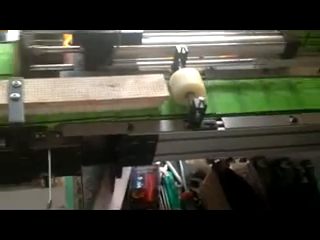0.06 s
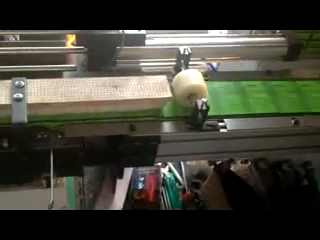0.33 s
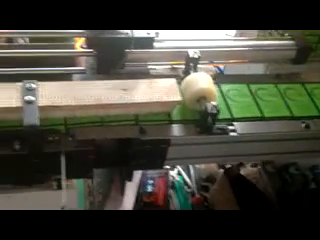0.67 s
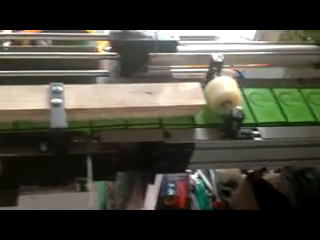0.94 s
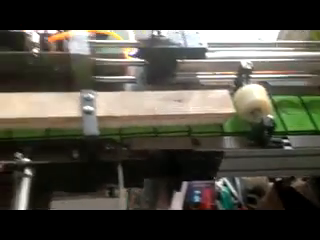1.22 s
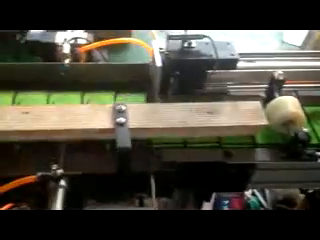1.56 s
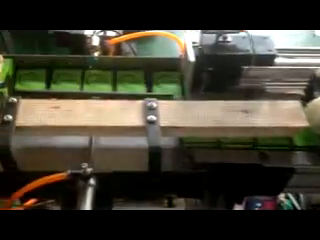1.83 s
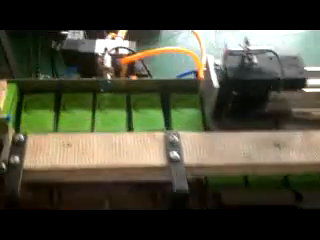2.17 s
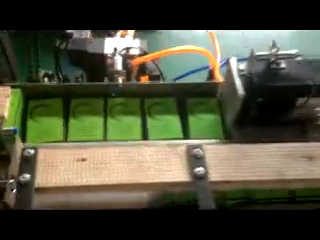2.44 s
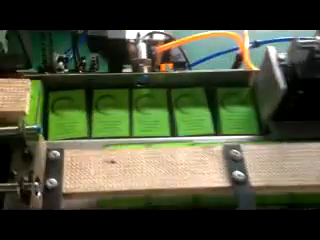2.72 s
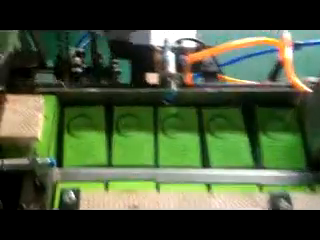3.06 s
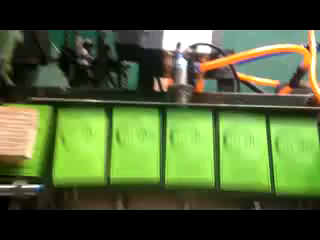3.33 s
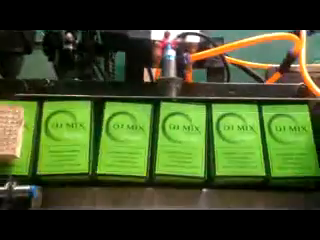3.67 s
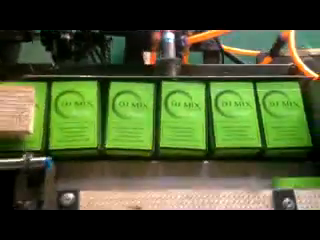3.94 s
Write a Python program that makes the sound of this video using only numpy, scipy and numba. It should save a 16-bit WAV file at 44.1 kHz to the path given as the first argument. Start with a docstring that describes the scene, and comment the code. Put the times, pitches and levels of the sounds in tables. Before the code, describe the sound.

A pneumatic packing machine hums, rattles and hisses close by in a factory hall, cutting out briefly at 0.1 seconds. The air whistles from 0.5 to 1.2 seconds. Cylinders slam with metallic clacks around 0.6, 0.7, 1.5, 1.8, 3.1, 3.4 and 4 seconds. Pushers and cartons knock in clusters from 1.3 to 1.8, then singly. Slides groan briefly around 1.7 and 2, and repeatedly after 3.2 seconds.

```python
"""A factory hall, close to a pneumatic carton-packing machine.
A motor hums and rattles once per turn, and a jet of compressed air hisses, whistling for a while.
Cylinders slam into their end stops with a short metal chatter; pushers and cartons knock in between.
Slides groan with friction as they travel. The sound cuts out briefly near the start."""
import sys
import numpy as np
from scipy import signal
from scipy.fft import rfft, irfft
from scipy.io import wavfile
from numba import njit

SR = 44100
rng = np.random.default_rng(int(sys.argv[2]) if len(sys.argv) > 2 else 0)


def persist_wave(psi):
    """Save psi, clipped to +-1, as 16-bit WAV."""
    counts = np.round(np.clip(psi, -1, 1) * 32767).astype(np.int16)
    wavfile.write(sys.argv[1], SR, np.atleast_2d(counts).T)


N = 176400
T = np.arange(N) / SR
CLACK_RISE_S = 0.00049


def amp(db):
    """Decibels to gain."""
    return 10 ** (np.asarray(db) / 20)


def unit(x):
    """Scale to rms 1."""
    return x / np.sqrt(np.mean(x ** 2))


def noise():
    """White noise."""
    return rng.standard_normal(N)


def curves(table):
    """Each column after the first, interpolated linearly in time."""
    times_s, *columns = np.array(table).T
    return [np.interp(T, times_s, column) for column in columns]


def colour(x, spectrum):
    """Shape x by (Hz, dB) points; rms 1."""
    hz, db = np.array(spectrum).T
    bins_hz = np.maximum(np.fft.rfftfreq(N, 1 / SR), 1)
    gain = amp(np.interp(np.log(bins_hz), np.log(hz), db))
    return unit(irfft(rfft(x) * gain, N))


def wander(rate_hz):
    """Random drift, low-passed at about rate_hz; rms 1."""
    gain = np.exp(-(np.fft.rfftfreq(N, 1 / SR) / rate_hz) ** 2)
    return unit(irfft(rfft(noise()) * gain, N))


@njit
def svf(x, hz, width_hz):
    """State-variable band-pass with moving centre and width."""
    y, band_state, low_state = np.empty(len(x)), 0., 0.
    for i in range(len(x)):
        g, damping = np.tan(np.pi * hz[i] / SR), width_hz[i] / hz[i]
        v = (band_state + g * (x[i] - low_state)) / (1 + g * (g + damping))
        band_state = 2 * v - band_state
        low_state += 2 * g * v
        y[i] = damping * v
    return y


def band(x, hz, width_hz):
    """Two band-passes in series; rms 1."""
    hz, width_hz = hz * np.ones(N), width_hz * np.ones(N)
    return unit(svf(svf(x, hz, width_hz), hz, width_hz))


def strike(start_s, hold_s, t60_s):
    """Instant attack, hold, exponential release."""
    return (T >= start_s) * np.exp(-np.log(1000) * np.clip((T - start_s - hold_s) / t60_s, 0, 2))


def echoes(x, t60_s, db):
    """Add a dense tail of reflections."""
    tail = noise() * strike(0, 0, t60_s)
    return x + amp(db) * signal.fftconvolve(x, tail / np.sqrt(np.sum(tail ** 2)))[:N]


# Motor tones. Each row: frequency in Hz, base level in dB.
MOTOR_TONES = [(150.3, -37.5), (167, -42.5), (233.8, -42), (267.2, -41), (283.9, -46.5), (350.7, -46),
               (484.3, -46.5), (799, -46), (833, -41.5), (1119, -44), (1803, -50.5), (1886, -43)]
# Rattle spectrum. Each row: frequency in Hz, relative density in dB.
RATTLE_SPECTRUM = [(60, -7.5), (105, -14.5), (150, -3), (260, 0), (440, -1.5), (820, 2.5), (1000, -3),
                   (1500, -7), (1920, -6.5), (2300, -9.5), (3100, -14), (4000, -6.5), (5200, -7),
                   (8000, -24)]
# Motor gains. Each row: time in seconds, hum gain in dB, rattle gain in dB.
MOTOR_GAINS = [(.3, 2, -4), (1.2, 1.5, -3.5), (1.5, 4, 0), (3.05, 3.5, -1), (3.11, -10, -5.5),
               (3.3, -1, -2), (3.52, -4.5, -6), (3.9, -3.5, -2)]


def motor(shaft_hz=16.7, repeat_share=0.31, rattle_db=-23, sway_db=0.5):
    """Hum over a rattle that partly repeats on every turn of the shaft."""
    hum = 0
    for hz, db in MOTOR_TONES:
        peak = np.sqrt(2) * amp(db + sway_db * wander(5.3))
        hum += peak * np.sin(2 * np.pi * (hz * T + rng.random()) + 0.24 * wander(4.6))
    each_turn = np.resize(noise()[:int(SR / shaft_hz)], N)
    shaking = np.sqrt(repeat_share) * each_turn + np.sqrt(1 - repeat_share) * noise()
    rattle = colour(shaking * amp(sway_db * wander(40)), RATTLE_SPECTRUM)
    hum_gain_db, rattle_gain_db = curves(MOTOR_GAINS)
    return hum * amp(hum_gain_db) + rattle * amp(rattle_db + rattle_gain_db)


# Jet timbre at a moving listener. Each row: time in seconds, main resonance in Hz, its width in Hz,
# upper resonance in Hz, its relative level in dB, relative rush level in dB.
JET_TIMBRE = [(.9, 5470, 1850, 6960, -2.5, -6.5), (1.33, 5280, 1800, 6940, -10, -6),
              (2.1, 5490, 2120, 7500, -6.5, -10), (2.7, 5130, 1730, 7460, -3.5, -25.5),
              (3.25, 4550, 1510, 7170, -6, -8.5), (3.7, 5330, 1583, 7470, -10.5, -15)]
# Escaping air. Each row: time in seconds, level in dB.
JET_LEVEL = [(0, -19.5), (.2, -23), (.59, -21.5), (.612, -29), (.71, -28.5), (.735, -21.5), (1.15, -21),
             (1.3, -19), (1.4, -18), (1.445, -27.5), (1.78, -30.5), (1.98, -22), (3.06, -20.5),
             (3.11, -28.5), (3.42, -28), (3.49, -21.5), (3.8, -19)]


def air_jet(whistle_start_s=0.46, whistle_end_s=1.2):
    """Compressed air: two broad resonances, a lower rush and an edge tone, reflected by the frame."""
    main_hz, main_width_hz, upper_hz, upper_db, rush_db = curves(JET_TIMBRE)
    level_db, = curves(JET_LEVEL)
    main = band(noise(), main_hz, main_width_hz)
    upper = band(noise(), upper_hz, width_hz=860) * amp(upper_db)
    rush = band(noise(), hz=2260, width_hz=3600) * amp(rush_db)
    whistle = band(noise(), hz=4567, width_hz=220) * amp(-7.5)
    whistle *= (T > whistle_start_s) & (T < whistle_end_s)
    return unit(echoes(main + upper + rush + whistle, t60_s=0.06, db=-14)) * amp(level_db)


def contacts(rate_per_s=6000):
    """Dense tiny impacts of parts chattering against each other."""
    return (rng.random(N) < rate_per_s / SR) * np.sign(noise())


def snap(start_s, hz, rise_s):
    """First impact: a heavily damped ring that peaks at rise_s and lasts a few cycles."""
    age = np.clip((T - start_s) / rise_s, 0, 20)
    return age * np.exp(1 - age) * np.sin(2 * np.pi * hz * (T - start_s))


# Modes of the steel stops. Each row: frequency in Hz, width in Hz, relative level in dB.
STEEL_MODES = [(4020, 1400, 0), (4646, 510, -1), (5180, 1700, 0.5), (6390, 980, 1), (7760, 180, -5)]


def steel_ring():
    """Chatter ringing in the steel stops; rms 1."""
    return unit(sum(amp(db) * band(contacts(), hz, width_hz) for hz, width_hz, db in STEEL_MODES))


# Machine bed spectrum. Each row: frequency in Hz, relative density in dB.
BED_SPECTRUM = [(60, -26.5), (190, 8), (700, -6), (1100, 5.5), (1700, 0), (8000, -43.5)]
# End-stop hits. Each row: start in seconds, chatter hold in seconds, bed gain in dB, thump in Hz,
# clank gain in dB, clank in Hz, steel gain in dB.
CYLINDER_SLAMS = [(0.5912, 0.0025, -14.5, 970, -11.5, 2790, -17),
                  (0.735, 0.021, -20, 1320, -22.5, 2630, -17), (1.459, 0.012, -21.5, 410, -19.5, 2090, -13),
                  (1.828, 0.018, -19, 560, -24.5, 2060, -14.5),
                  (3.0676, 0.01, -17.5, 550, -20, 2090, -13.5), (3.4417, .014, -17.5, 294, -20, 2320, -12),
                  (3.961, 0.012, -21, 404, -18.5, 2210, -9.5)]


def cylinder_slams(impact_db=6.5, thump_rise_cycles=0.44):
    """A piston hits its stop and chatters: the bed thumps and booms, the bracket clanks, steel rings."""
    bed, steel, out = colour(contacts(), BED_SPECTRUM), steel_ring(), 0
    for start_s, hold_s, bed_db, thump_hz, clank_db, clank_hz, steel_db in CYLINDER_SLAMS:
        chatter = strike(start_s, hold_s, t60_s=0.057)
        clank = band(contacts(), clank_hz, width_hz=680) * chatter
        clank += amp(impact_db) * snap(start_s, clank_hz, CLACK_RISE_S)
        boom = bed * strike(start_s, hold_s / 2, t60_s=0.082)
        thump = amp(impact_db) * snap(start_s, thump_hz, thump_rise_cycles / thump_hz)
        out += amp(clank_db) * clank + amp(steel_db) * steel * chatter + amp(bed_db) * (boom + thump)
    return out


# Thud spectrum. Each row: frequency in Hz, relative density in dB.
THUD_SPECTRUM = [(80, -28.5), (300, -3.5), (550, 0), (780, 5.5), (1000, -6), (2000, -5.5), (6000, -20.5)]
# Knocks. Each row: start in seconds, thud gain in dB, clack gain in dB, clack in Hz, tick gain in dB.
PUSHER_KNOCKS = [(1.35, -42, -4, 2040, -23), (1.364, -30.5, -7.5, 2100, -22), (1.3896, -23, -9, 3070, -25),
                 (1.4222, -24.5, -14.5, 800, -15.5), (1.428, -17, -11.5, 1144, -27),
                 (1.629, -28, -16.5, 1380, -14.5), (1.641, -21, -10, 1930, -33),
                 (1.791, -11.5, -8.5, 1190, -25.5), (1.809, -17, -11.5, 1400, -19),
                 (2.2974, -16, -10, 1270, -19), (2.8675, -16.5, -7.5, 1850, -25),
                 (3.3987, -16, -6.5, 720, -22.5), (3.4165, -16, -10, 530, -21),
                 (3.922, -18.5, -15.5, 1400, -22)]


def pusher_knocks(rattle_db=-8.5):
    """Pushers and cartons knock: a clack at the struck part's pitch, a hollow thud, a steel tick."""
    thud, tick, out = colour(contacts(), THUD_SPECTRUM), steel_ring(), 0
    for start_s, thud_db, clack_db, clack_hz, tick_db in PUSHER_KNOCKS:
        rattle = band(contacts(), clack_hz, width_hz=1800) * strike(start_s, 0, t60_s=0.023)
        out += amp(clack_db) * (snap(start_s, clack_hz, CLACK_RISE_S) + amp(rattle_db) * rattle)
        out += amp(thud_db) * thud * strike(start_s, 0, t60_s=0.098)
        out += amp(tick_db) * tick * strike(start_s, 0, t60_s=0.088)
    return out


def rod_ping(start_s=1.642, hz=4470, db=-16):
    """A knocked rod rings once."""
    return amp(db) * np.sin(2 * np.pi * hz * T) * strike(start_s, 0, t60_s=0.2)


# Groans. Each row: start in seconds, length in seconds, start pitch in Hz, end pitch in Hz, gain in dB.
SLIDE_GROANS = [(1.654, 0.064, 345, 384, -27), (1.655, 0.13, 545, 533, -29.5),
                (2.043, 0.077, 401, 391, -26.5), (3.203, 0.19, 404, 357.5, -29),
                (3.27, 0.15, 573, 493, -30), (3.319, 0.12, 305.3, 276, -32.5),
                (3.399, 0.066, 258.4, 205, -30), (3.56, 0.11, 287.7, 285, -28.5),
                (3.676, 0.053, 376.6, 400, -23.5), (3.722, 0.13, 428, 394, -31),
                (3.919, 0.059, 394, 372, -23.5)]


def slide_groans(roughness=0.73, width_hz=77):
    """Travelling slides: rough, gliding friction tones that swell and fade."""
    out = 0
    for start_s, length_s, start_hz, end_hz, db in SLIDE_GROANS:
        travel = np.clip((T - start_s) / length_s, 0, 1)
        phase = 2 * np.pi * np.cumsum(start_hz + (end_hz - start_hz) * travel) / SR
        rasp = wander(width_hz) * np.cos(phase) + wander(width_hz) * np.sin(phase)
        tone = np.sqrt(2) * np.sin(phase) + roughness * rasp
        out += amp(db) * np.sin(np.pi * travel) * tone
    return out


def scene():
    """Motor and air, with the blows and groans echoing in the hall; mono."""
    running = motor() + air_jet()
    strokes = cylinder_slams() + pusher_knocks() + rod_ping() + slide_groans()
    return (running + echoes(strokes, t60_s=0.4, db=-13.5))[None]


def record(dry):
    """Brief dropout, bass cut, soft clipping, treble cut."""
    dropout_start_s, dropout_end_s = 0.07, 0.1902
    low_cut_hz, high_cut_hz = 97, 8130
    live = (T < dropout_start_s) | (T > dropout_end_s)
    thinned = signal.sosfilt(signal.butter(4, low_cut_hz, "high", fs=SR, output="sos"), dry * live)
    rounded = np.tanh(0.67 * thinned) / 0.74
    return signal.sosfilt(signal.ellip(12, .2, 90, high_cut_hz, fs=SR, output="sos"), rounded)


dry = scene()
out = record(dry)
persist_wave(out)
```